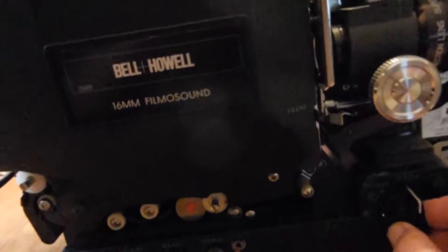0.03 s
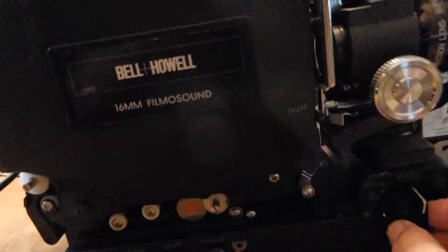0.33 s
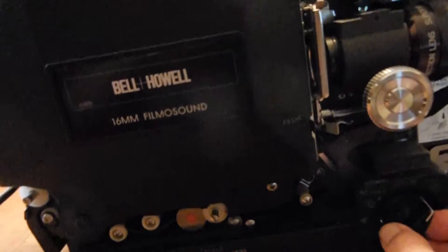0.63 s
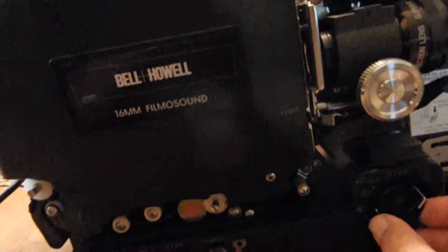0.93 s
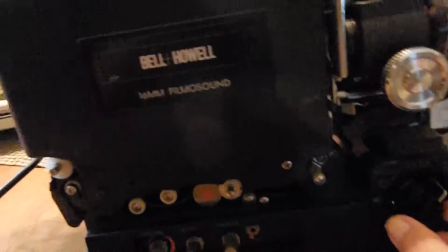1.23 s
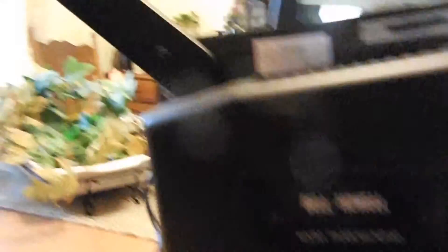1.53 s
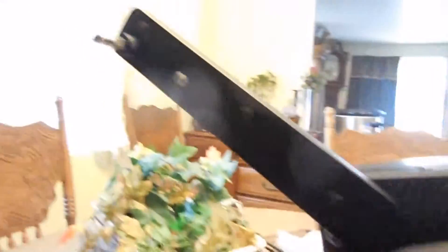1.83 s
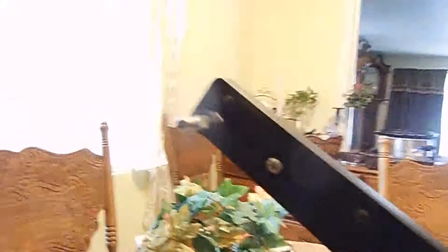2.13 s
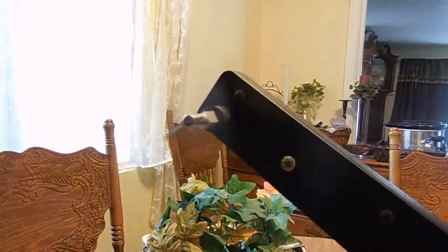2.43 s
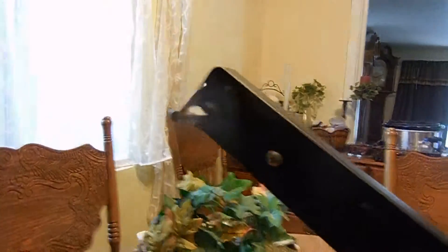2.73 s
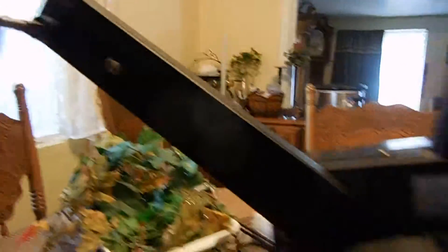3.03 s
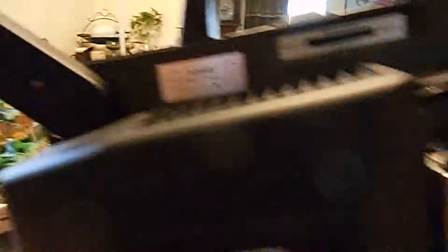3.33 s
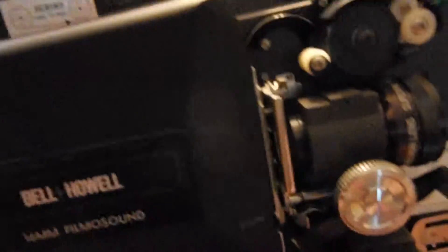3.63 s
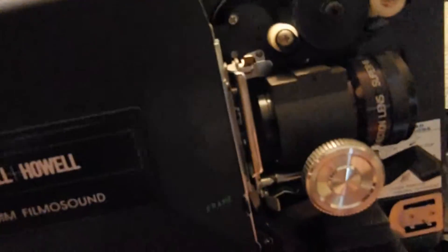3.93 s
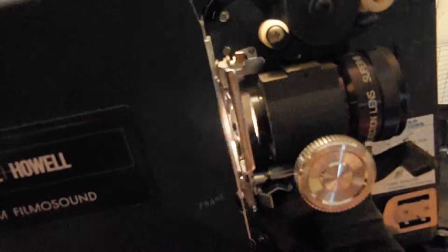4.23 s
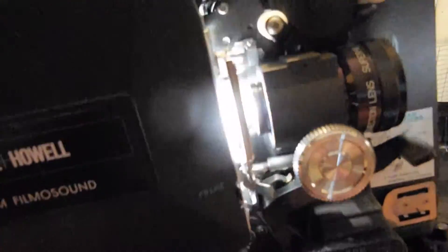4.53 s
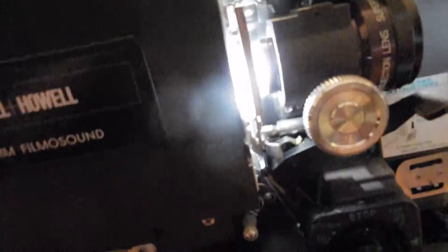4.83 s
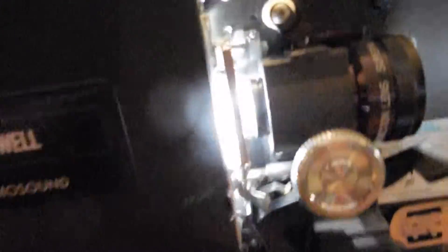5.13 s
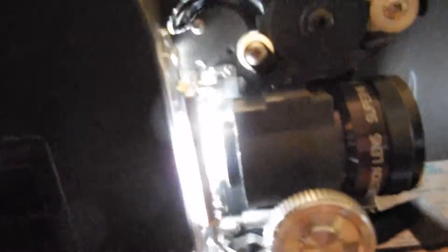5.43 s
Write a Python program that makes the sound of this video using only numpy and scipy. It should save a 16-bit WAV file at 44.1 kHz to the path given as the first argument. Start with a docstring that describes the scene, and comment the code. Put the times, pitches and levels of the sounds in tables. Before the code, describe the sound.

Faint room tone is heard for the first half second. At about 0.5 seconds a switch snaps sharply, a metal panel rings briefly, and a film projector spins up with a short rub of belt slip. By 0.9 seconds it runs with a loud, steady whir: rushing fan air, rapid even clatter, gear whine and a low, slowly beating hum. Loose parts tick lightly, and a soft scuff repeats about four times a second. The close microphone moves around the machine, so airy vent hiss swells near 1.6 and 3.3 seconds, with a slightly softer stretch between. From about 3.8 seconds the whir is a little fuller. A few small metallic pings and dry clacks fall between 3.4 and 4.5 seconds. A second switch click comes at 4.2 seconds, and the projector keeps running until the end, around 5.5 seconds.

```python
"""A quiet room. A switch snaps, the front panel rings, and a 16 mm film projector runs up to about
24 frames a second: the fan rushes and the claw clatters through the casing, gears whine, the motor
hum beats and the belt slips briefly. Loose parts tick and a pulley rubs once a turn. The microphone
travels from the panel up to the reel arm and back to the lens, crossing the hissing top grille each
way. Late on come a few pings and clacks, and a second click lights the lamp, whose load dips the speed."""
import sys
import numpy as np
from scipy import signal
from scipy.fft import rfft, irfft, next_fast_len
from scipy.io import wavfile

SR = 44100
rng = np.random.default_rng(int(sys.argv[2]) if len(sys.argv) > 2 else 0)


def log_audio(samples):
    """Write samples as a 16-bit WAV file to the path given in sys.argv[1]."""
    # one column per channel
    frames = np.atleast_2d(samples).T
    # limit to full scale, then quantise
    limited = np.clip(frames, -1, 1)
    pcm = np.round(limited * 32767).astype(np.int16)
    wavfile.write(sys.argv[1], SR, pcm)


N = 245637
TIME = np.arange(N) / SR
FREQS = np.maximum(np.arange(N // 2 + 1) * SR / N, 1)
MOTOR_ON_S, LAMP_ON_S, FRAMES_PER_S = .5432, 4.1785, 24.157

# microphone path: t/s, place (0 front panel, 1 reel arm, 2 lens; the grille lies halfway between each)
MIC_PATH = [(1.25, 0.062), (1.6, 0.57), (1.9, 0.69), (2.3, 1), (2.8, 1.07), (3.05, 1.32), (3.3, 1.48),
            (3.8, 1.95), (4.4, 2)]
# stereo width: f/Hz, left-right correlation
STEREO_LIKENESS = [(100, 0.99), (350, 0.99), (700, 0.98), (1400, 0.79), (2800, 0.68), (5000, 0.18),
                   (9000, 0.052), (15000, 0.038)]
# stereo lean: f/Hz, left minus right/dB
STEREO_LEAN = [(100, 0.5), (700, -0.5), (1290, 3.5), (2380, -1.5), (4400, 3.5), (8120, 4), (15000, 1.5)]
# colour of the room tone: f/Hz, relative level/dB
ROOM_COLOUR = [(12, -29), (20, -5.5), (113, -18.5), (150, -12), (177, -27), (301, -19.5), (542, -18.5),
               (923, -18.5), (3070, -26), (14700, -28.5), (16000, -28)]
# the switch snaps over, settles, then lights the lamp: t/s, level/dB, f/Hz, spread/octaves, t60/s
SWITCH_SNAPS = [(.5432, -14.2, 8900, .86, .021), (.6175, -27, 6800, .42, .032),
                (4.1785, -15, 12000, .64, .02)]
# ring of the front panel: f/Hz, level/dB, t60/s
PANEL_MODES = [(312, -44, 0.15), (577, -43, 0.12), (757, -38.5, .13), (870, -42, .08), (1195, -45, 0.19),
               (1380, -42, 0.098), (2440, -42, 0.075), (3700, -43, 0.065)]
# claw and shutter contacts in one frame: share of the cycle, relative level/dB
CLAW_CONTACTS = [(0, 2), (.21, -4), (0.401, -1.5), (0.608, -6), (.8, -6)]
# peaks and hollows of the casing: f/Hz, width/Hz, gain/dB at the panel, at the arm, at the lens
CASING_MODES = [(335, 40, 8.5, 5.5, 3), (550, 120, -2.5, 3.5, 0.5), (608, 48, 4.5, -1, 2.5),
                (666, 53, 2, 1, -3.5), (780, 86, 7, 1.5, 3), (1242, 34, -1.5, -7.5, -8.5),
                (1480, 47, 6, -2, 1.5), (1714, 34, -11, 0.5, -8.5), (1704, 72, -4, -4.5, 1.5),
                (2010, 110, -4, -3.5, -0.5), (2160, 26, 5, -2, 7.5), (2308, 17, -7, 1, 5),
                (2470, 17, 5, 6, 2), (3000, 910, 0, 1.5, -2.5), (3160, 450, 0, -1.5, 1.5),
                (3670, 173, 8.5, 4, 8), (3810, 66, -1, 12.5, -5), (3920, 87, 8, 7, 7.5),
                (4160, 150, -8, 2, -4.5), (4340, 190, 2.5, 4, -0.5), (4970, 116, 7, 11.5, 3.5),
                (5230, 170, 3.5, 4, 4.5), (5850, 110, 3.5, 4, 2.5), (7790, 270, 5, -0.5, 5),
                (8420, 550, -5, -3.5, -2), (9850, 340, 6, 3.5, 6), (10480, 480, 8.5, 3, 7.5)]
# colour of the rush: f/Hz, relative level/dB
RUSH_SPECTRUM = [(40, -16.5), (100, -12.5), (220, -7), (340, -1.5), (560, 3.5), (720, 0), (1250, -1.5),
                 (1800, -2.5), (2700, -7), (5600, -9), (6700, -17), (9200, -20.5), (11500, -21),
                 (15500, -28)]
# lows, mids and hiss of the rush: level/dB at panel, arm, lens, grille lift/dB, loss at standstill/dB
RUSH_LEVELS = [(-32.5, -35.5, -30.5, 0.5, 25), (-30.5, -34.5, -29, 1.4, 35), (-35, -34.5, -34.5, 0.6, 33)]
# strong gear and motor tones: multiple of the frame rate
STRONG_ORDERS = [43, 44, 49.08, 54.07, 56.08, 59.02]
# one row for each strong tone: level/dB at panel, arm, lens, grille lift/dB
STRONG_LEVELS = [(-38.5, -42, -40, 7), (-39.5, -42, -39.5, 7), (-34.5, -40.5, -42.5, 0),
                 (-52, -37.5, -42.5, 6.5), (-37, -46, -39.5, 0), (-44.5, -43, -37.5, 5.5)]
# weak tones: multiple of the frame rate
WEAK_ORDERS = [3, 4, 6, 8, 14, 15, 21, 22, 23, 25, 26, 39.15, 64, 68.95, 90.75, 91.85, 95.4, 96.8]
# one entry for each weak tone: relative level/dB
WEAK_LEVELS = [-62, -59.5, -56, -56, -46.5, -48.5, -56.5, -51.5, -50.5, -49.5, -51.5, -43.5, -55, -45, -60,
               -41.5, -54, -44]
# resonances rung by the slipping belt: f/Hz, width/Hz, relative level/dB
BELT_RESONANCES = [(340, 31, -23), (634, 40, -2), (790, 84, -8), (1090, 77, -17), (1203, 86, -0.5),
                   (2327, 92, -5), (2730, 49, -15), (4640, 260, -13), (5600, 400, -11.5)]
# sharpest ticks of loose parts: t/s, level/dB
SHARP_TICKS = [(0.7347, -28), (1.078, -29), (1.294, -35), (1.609, -24), (4.5325, -23)]
# rubs of the pulley: t/s, relative level/dB
PULLEY_RUBS = [(0.808, -24.5), (1.06, -24), (1.355, -27), (1.606, -25.5), (1.874, -28), (2.137, -33),
               (2.409, -31), (2.676, -36), (2.944, -30), (3.202, -25), (3.467, -23.5), (3.714, -24),
               (3.995, -27.5), (4.27, -26), (4.538, -24.5), (4.736, -27), (4.812, -24), (5.052, -26),
               (5.288, -28.5)]
# pings of a small metal part: t/s, level/dB
METAL_PINGS = [(3.404, -20), (3.936, -23), (4.4707, -17.5)]
# clacks of the gearing: t/s, level/dB
GEAR_CLACKS = [(3.715, -30), (3.987, -23), (4.516, -19)]


def from_db(db):
    """Decibels to gain."""
    return 10 ** (np.asarray(db) / 20)


def unit_rms(x):
    """Scale to unit power."""
    return x / np.sqrt(np.mean(x ** 2) + 1e-20)


def curve(points):
    """Draw a curve through points on a log-frequency axis."""
    hz, value = np.transpose(points)
    return np.interp(np.log(FREQS), np.log(hz), value)


def bell(hz, octaves):
    """A bell-shaped band on the log-frequency axis."""
    return np.exp(-.5 * (np.log2(FREQS / hz) / octaves) ** 2)


def resonance(hz, width_hz):
    """One resonant peak of height 1."""
    return 1 / (1 + (2 * (FREQS - hz) / width_hz) ** 2)


def eq(x, gain):
    """Colour a sound by a gain per frequency."""
    size = next_fast_len(x.shape[-1] + 2048)
    hz = np.arange(size // 2 + 1) * SR / size
    return irfft(rfft(x, size) * np.interp(hz, FREQS, gain), size)[..., :x.shape[-1]]


def drift(rate_hz):
    """A random modulator of unit power."""
    knots = rng.standard_normal(int(N / SR * rate_hz) + 3)
    return unit_rms(np.interp(TIME * rate_hz, np.arange(len(knots)), knots))


def stereo(pair, gain, out_of_step=.12, swap_hz=884):
    """Two unrelated sounds become left and right, narrow in the bass and wide in the treble."""
    alike = curve(STEREO_LIKENESS)
    mid = eq(pair[0], gain * np.sqrt(1 + alike))
    apart = gain * np.sqrt(1 - alike)
    # reflections make now one channel lead, now the other, along the frequency axis
    lead = 1j * np.tanh(10 * np.sin(np.pi * FREQS / swap_hz))
    side = eq(pair[0], lead * apart * np.sqrt(out_of_step))
    side += eq(pair[1], apart * np.sqrt(1 - out_of_step))
    lean = from_db(curve(STEREO_LEAN) / 2)
    return unit_rms(np.array([eq(mid + side, lean), eq(mid - side, 1 / lean)]))


def noise(gain):
    """Coloured stereo noise of unit power."""
    return stereo(rng.standard_normal((2, N)), gain)


def mic_place():
    """Where the microphone is on its path at every sample."""
    return np.interp(TIME, *np.transpose(MIC_PATH))


def nearness():
    """Crossfade weights, 0-1, for the panel, the arm and the lens."""
    return np.array([np.maximum(1 - abs(mic_place() - k), 0) for k in range(3)])


def over_grille(focus=3.2):
    """The top grille beams upwards: 1 straight above it, 0 away from it."""
    return abs(np.sin(np.pi * mic_place())) ** focus


def path_db(rows):
    """Ride each level along the microphone's path, from its three places and its grille lift."""
    return np.array(rows) @ np.vstack([nearness(), over_grille()])


def room_tone():
    """The steady noise bed of the quiet room."""
    return from_db(-55.5) * noise(from_db(curve(ROOM_COLOUR)))


def snap(s, db, hz, octaves, t60, pan_db=0, rise_s=.00017, tail_db=-25, tail_t60=.26):
    """A dense, quickly dying metallic ring with a faint tail from the room."""
    out, age, start = np.zeros((2, N)), TIME[:SR // 4], int(s * SR)
    ringing = unit_rms(eq(rng.standard_normal((2, len(age))), bell(hz, octaves)))
    attack = 1 - np.exp(-age / rise_s)
    decay = from_db(-60 * age / t60) + from_db(tail_db - 60 * age / tail_t60)
    out[:, start:start + len(age)] = from_db(db) * ringing * attack * decay
    return out * from_db([[pan_db / 2], [-pan_db / 2]])


def switch():
    """The switch snaps over for the motor, settles, and snaps again for the lamp."""
    return sum(snap(*row) for row in SWITCH_SNAPS)


def panel_ring():
    """The panel rings on after the first snap of the switch."""
    age = np.maximum(TIME - MOTOR_ON_S, 0)
    return sum(from_db(db - 60 * age / t60) * np.sin(2 * np.pi * hz * age) * (-1) ** k
               for k, (hz, db, t60) in enumerate(PANEL_MODES))


def drive_speed(spin_up_s=.125, steepness=1.6, sag_frames_per_s=.09, sag_s=.17):
    """Share of full speed: the drive spins up in an S-curve, then sags briefly under the lamp's load."""
    running = np.maximum(TIME - MOTOR_ON_S, 0) / spin_up_s
    lit = np.maximum(TIME - LAMP_ON_S, 0) / sag_s
    sag = sag_frames_per_s / FRAMES_PER_S * lit * np.exp(1 - lit)
    return 1 - np.exp(-running ** steepness) - sag


def claw(frames, jitter_s=.00025, uneven_db=3.5, t60=.03, rise_s=.00062):
    """Every contact of the frame cycle rings the casing's dense modes in its own way."""
    out, age = np.zeros((2, N)), TIME[:SR // 8]
    # the ring takes a moment to spread through the metal
    envelope = from_db(-60 * age / t60) * (1 - np.exp(-age / rise_s))
    for share, db in CLAW_CONTACTS:
        times = np.interp(np.arange(1, int(frames[-1])) + share, frames, TIME)
        late, strength = rng.standard_normal((2, len(times)))
        samples = np.clip((times + jitter_s * late) * SR, 0, N - 1).astype(int)
        blows = np.bincount(samples, from_db(db + uneven_db * np.tanh(strength)), N)
        ringing = rng.standard_normal((2, len(age))) * envelope
        out += signal.fftconvolve(blows[None], ringing, axes=1)[:, :N]
    return eq(unit_rms(out), bell(1267, .32) + from_db(-10) * bell(1267, 2.1))


def from_the_right(sound, lag_s=.00012, direct_share=.41, shade_db=-2.5):
    """Part of the treble reaches the left channel as a late, shaded copy of the right."""
    left, right = sound
    late = np.interp(TIME - lag_s, TIME, right)
    direct = direct_share / (1 + (1500 / FREQS) ** 4)
    shade = from_db(shade_db / (1 + (4000 / FREQS) ** 2))
    return np.array([eq(left, shade * np.sqrt(1 - direct)) + eq(late, shade * np.sqrt(direct)), right])


def casing(sound, ripple_db, spacing_hz):
    """Each place hears its own mix of casing resonances; at the arm the sound comes from the right."""
    knots = rng.standard_normal(2000)
    ripple = np.interp(FREQS / spacing_hz, np.arange(len(knots)), knots)
    fine_db = ripple_db * ripple * FREQS / (FREQS + 1500)
    out = 0
    for k, (near, heard) in enumerate(zip(nearness(), (sound, from_the_right(sound), sound))):
        modes_db = sum(gains_db[k] * resonance(hz, width) for hz, width, *gains_db in CASING_MODES)
        out = out + near * eq(heard, from_db(modes_db + fine_db))
    return out


def rush(frames, speed, claw_db=.5, flutter_db=.65, swell_db=.45):
    """Fan air and claw clatter leave through the same casing, louder and brighter with speed."""
    clatter = from_db(claw_db) * claw(frames)
    fan = rng.standard_normal((2, N))
    inside = stereo(fan + clatter, from_db(curve(RUSH_SPECTRUM)))
    outside = casing(inside, ripple_db=2.5, spacing_hz=39.92)
    below_mid, below_hiss = 1 / (1 + (FREQS / 1300) ** 4), 1 / (1 + (FREQS / 6500) ** 8)
    bands = (below_mid, below_hiss - below_mid, 1 - below_hiss)
    levels = np.array(RUSH_LEVELS)
    band_db = path_db(levels[:, :-1]) - levels[:, -1:] * (1 - speed) + swell_db * drift(12)
    band_db[1:] += flutter_db * drift(90)  # only mids and hiss flutter
    return sum(unit_rms(eq(outside, band)) * from_db(db) for band, db in zip(bands, band_db))


def gear_tone(frames, order, waver_rad, phase_spread, pan_db, rough_db, arm_lag):
    """One tone, wavering in phase and strength; up at the arm it reaches the left channel later."""
    phase = 2 * np.pi * order * frames + rng.uniform(0, 2 * np.pi) + waver_rad * drift(14)
    apart = (phase_spread * drift(1.22) - arm_lag * nearness()[1]) * order / STRONG_ORDERS[0]
    sides = np.array([[1], [-1]])
    gain = from_db(sides * pan_db / 2 + rough_db * drift(45))
    return np.sqrt(2) * np.sin(phase + sides * apart) * gain


def gear_whine(frames, speed, weak_trim_db=-1.5, weak_arm_db=-5.5):
    """Tooth and motor tones glide up and swell with the drive; the weak ones duck at the arm."""
    strong = sum(from_db(db + drift(3.94))
                 * gear_tone(frames, k, waver_rad=.12, phase_spread=.04, pan_db=0,
                             rough_db=1.5, arm_lag=.21)
                 for k, db in zip(STRONG_ORDERS, path_db(STRONG_LEVELS)))
    weak = sum(from_db(db + 3.1 * drift(1.996))
               * gear_tone(frames, k, waver_rad=.3, phase_spread=.2, pan_db=-1.4,
                           rough_db=2, arm_lag=.76)
               for k, db in zip(WEAK_ORDERS, WEAK_LEVELS))
    return (strong + weak * from_db(weak_trim_db + weak_arm_db * nearness()[1])) * speed ** 3


def motor_hum(frames, speed, mains_hz=60, null_s=1.993, rise_s=.078):
    """The hum swells in at twice the mains rate and beats against the drive's fifth order."""
    hum_phase, drive_phase = 2 * np.pi * 2 * mains_hz * TIME, 2 * np.pi * 5 * frames
    offset = np.interp(null_s, TIME, drive_phase - hum_phase)  # the two cancel at null_s
    beating = np.sin(hum_phase) - .99 * speed ** 4 * np.sin(drive_phase - offset)
    swell = 1 - np.exp(-np.maximum(TIME - MOTOR_ON_S, 0) / rise_s)
    level_db = np.array([-42.5, -44, -41.2]) @ nearness()  # panel, arm, lens
    return swell * from_db(level_db) * beating


def belt_slip(start_s=.577, attack_s=.07, hold_s=.16, release_s=.05, level_db=-36.5, grain_db=2):
    """The belt slips as it pulls the drive up to speed, and the friction rings a few resonances."""
    modes = sum(from_db(db) * resonance(hz, width) for hz, width, db in BELT_RESONANCES)
    slip = np.interp(TIME, np.cumsum([start_s, attack_s, hold_s, release_s]), [0, 1, 1, 0])
    return slip * from_db(level_db + grain_db * drift(140)) * noise(modes)


def faint_ticks(speed, per_s=13, level_db=-29.5, arm_db=-4, t60=.033):
    """Loose small parts tick at random once the drive runs, softer up at the arm."""
    hits = (rng.random(N) < per_s / SR) * from_db(rng.uniform(-8.5, 0, N))
    envelope = signal.lfilter([1], [1, -from_db(-60 / (t60 * SR))], hits + 1e-18)
    return speed ** 4 * from_db(level_db + arm_db * nearness()[1]) * envelope * noise(bell(12810, .3))


def sharp_ticks():
    """A few bright ticks of loose parts stand out, a little to the left."""
    return sum(snap(s, db, hz=12300, octaves=.38, t60=.022, pan_db=3) for s, db in SHARP_TICKS)


def pulley_rub(half_length_s=.016, grain_db=1.9, trim_db=-3):
    """A short gritty scuff about once a turn, ringing the casing."""
    pressure = sum(from_db(db) * np.exp(-.5 * ((TIME - s) / half_length_s) ** 2)
                   for s, db in PULLEY_RUBS)
    scuff = pressure * from_db(trim_db + grain_db * drift(300)) * noise(bell(1480, .99))
    return casing(scuff, ripple_db=3, spacing_hz=113.2)


def vent_hiss(level_db=-34.5, narrowing=3.3):
    """Cooling air hisses through the slots of the grille in a narrow beam."""
    return from_db(level_db) * over_grille() ** narrowing * noise(bell(4970, .22))


def metal_pings():
    """A small metal part rings in a narrow, high band."""
    return sum(snap(s, db, hz=5160, octaves=.069, t60=.026, pan_db=3.5) for s, db in METAL_PINGS)


def gear_clacks():
    """The gearing gives a few dry midrange knocks."""
    return sum(snap(s, db, hz=2174, octaves=.75, t60=.017) for s, db in GEAR_CLACKS)


def scene():
    """Room tone, the switch, then the running machine with its small accents."""
    speed = drive_speed()
    frames = FRAMES_PER_S * np.cumsum(speed) / SR
    powered = np.clip((TIME - MOTOR_ON_S) / .012, 0, 1)
    air = rush(frames, speed) + vent_hiss()
    drive = gear_whine(frames, speed) + motor_hum(frames, speed) + belt_slip() + faint_ticks(speed)
    accents = pulley_rub() + switch() + panel_ring() + metal_pings() + gear_clacks() + sharp_ticks()
    return room_tone() + powered * (air + drive) + accents


def record(dry):
    """A steep high cut takes off the very top."""
    cutoff_hz = 15850
    return eq(dry, 1 / (1 + (FREQS / cutoff_hz) ** 300))


dry = scene()
out = record(dry)
log_audio(out)
```